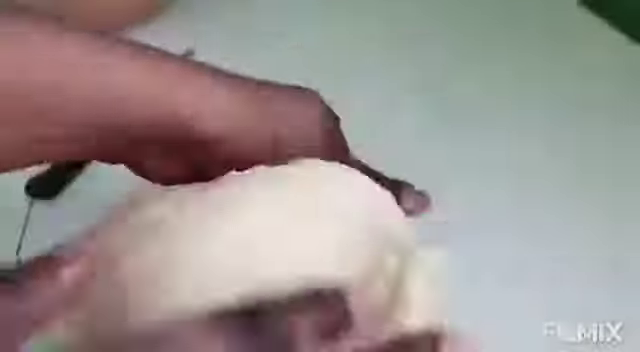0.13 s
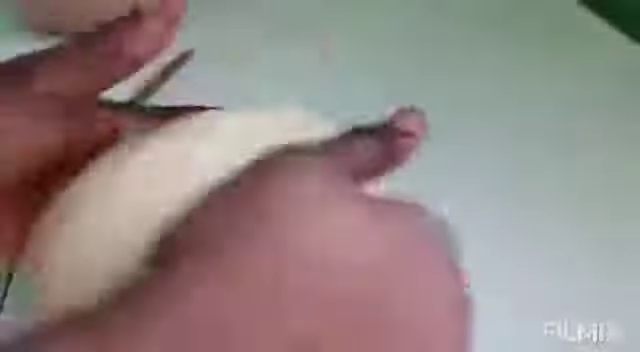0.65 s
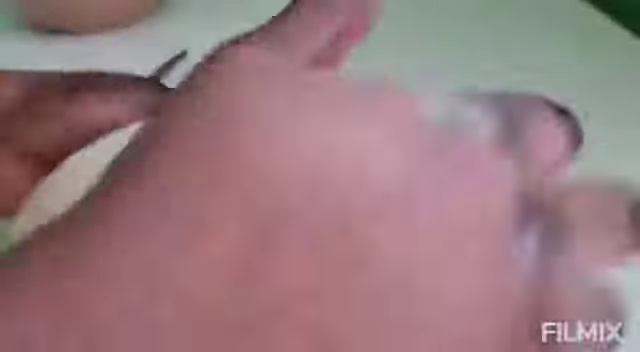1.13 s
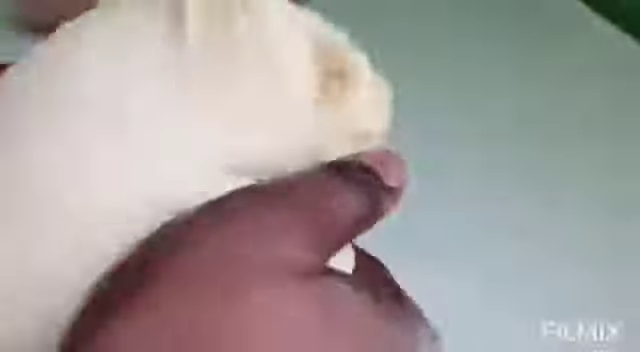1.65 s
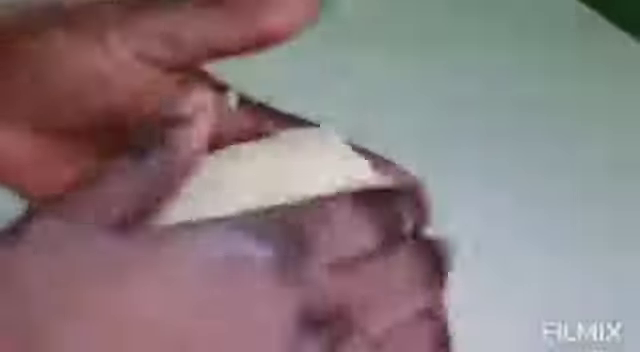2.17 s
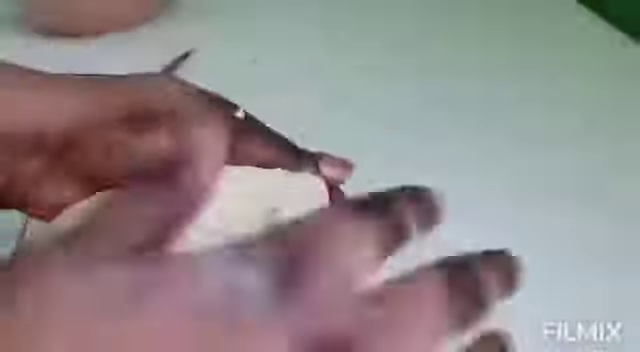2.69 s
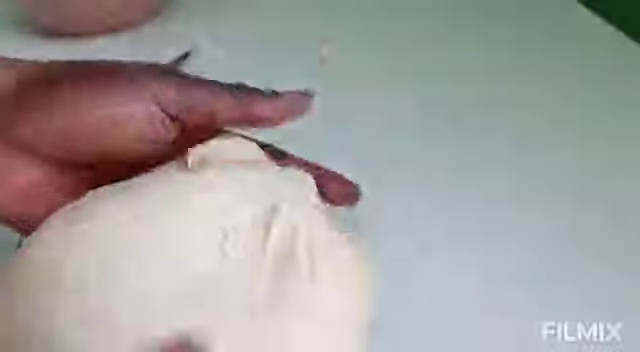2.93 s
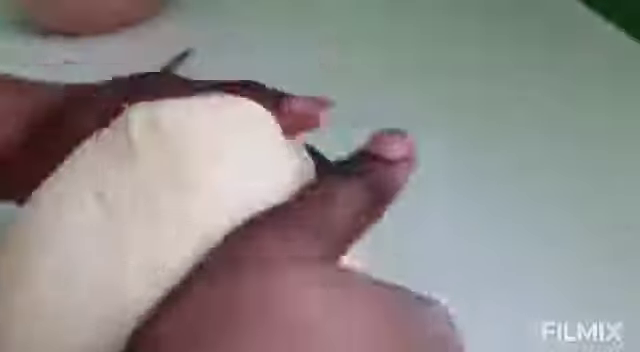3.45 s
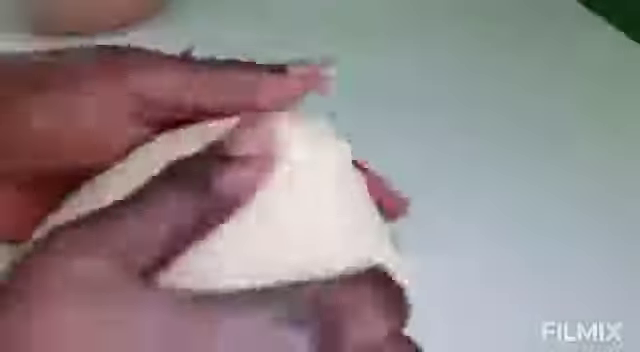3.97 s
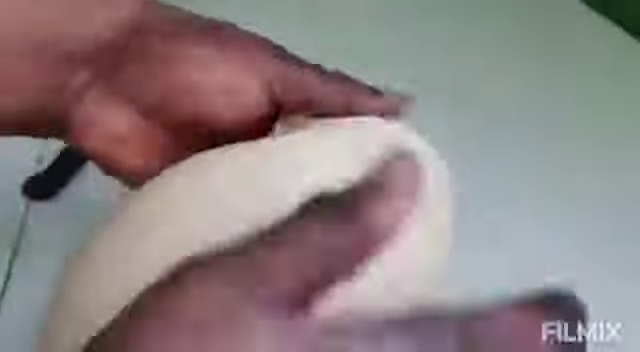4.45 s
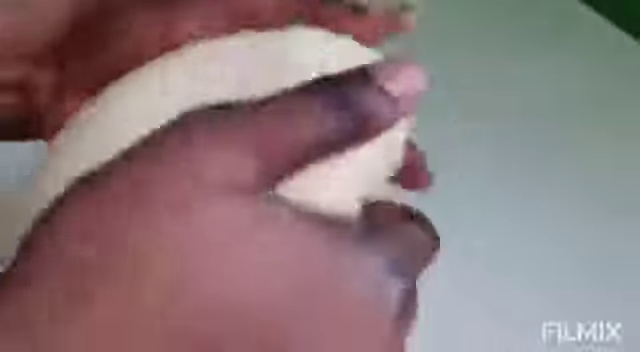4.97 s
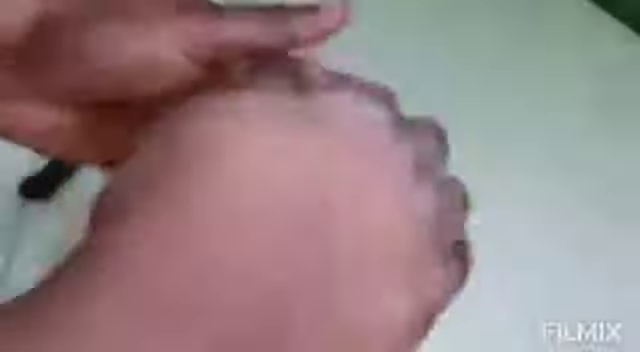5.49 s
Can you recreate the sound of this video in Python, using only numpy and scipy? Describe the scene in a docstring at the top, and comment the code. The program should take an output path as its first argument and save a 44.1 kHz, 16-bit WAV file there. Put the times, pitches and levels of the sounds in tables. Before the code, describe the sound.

Hands knead a ball of dough on a light table in a quiet kitchen, heard close and leaning left, with only a slight short room echo. From 0 to 1.4 s come uneven soft thumps, near 0.15, 0.65 to 0.7, 0.95 and 1.2, with low hollow table rumble between. Firmer thuds follow at 1.5, 1.7 and 1.85, and the heaviest slap falls at 2.0, a deep thump with a dull crack, brief knocking ring and moist squelch. After 2.2 it is calmer: faint rubbing, light dry rustles near 2.7, soft presses at 2.8, 3.1 and 3.7. Near-quiet follows until 4.5, when firm slaps resume at 4.55, 4.75, 4.9, 5.3 and strongly at 5.4, with a last knock at 5.5. Palm strokes swish weakly around the blows. Throughout, a thin high cricket whine wavers over faint airy hiss, until the end at about 5.6 s.

```python
"""In a quiet kitchen, hands knead a ball of dough on a light table: each press thumps the top and excites
its modes, and firm slaps crack, squeeze out puffs of air and ring the higher modes.
The rolling dough drives low modes with random force; palm strokes swish and squelch as shaped noise.
Crickets whine outside as wavering sines, faint air noise hisses, and feedback delays give the room's echo."""
import sys
import numpy as np
from scipy import signal
from scipy.io import wavfile

SR = 44100
rng = np.random.default_rng(int(sys.argv[2]) if len(sys.argv) > 2 else 0)


def ratio_of_db(decibels):
    """Turn decibels (scalar or array-like) into linear amplitude factors; 0 dB maps to 1."""
    return 10 ** (np.asarray(decibels, float) / 20)


def to_wav(s):
    """Save 16-bit WAV."""
    ch = np.atleast_2d(s).T  # columns
    pcm = np.round(np.clip(ch, -1, 1) * 32767)  # PCM
    wavfile.write(sys.argv[1], SR, pcm.astype(np.int16))


N = 247834   # samples

# Presses of the hands. Each row: start in seconds, then drive in dB of the soft thud, the rocking mode,
# the bending mode and the panel modes.
PRESSES = [(0.127, -39, -30.5, -38, -54), (0.163, -15.5, -33, -33, -44.5), (0.455, -53, -37, -39.5, -68),
           (0.548, -46, -47, -35.5, -60), (0.646, -19, -39, -42, -50.5), (0.697, -21, -57, -9.5, -36.5),
           (0.773, -43, -46, -20.5, -48), (0.796, -44, -52, -22.5, -53), (0.935, -16, -34.5, -31.5, -49),
           (1.001, -26.5, -34.5, -44, -52.5), (1.191, -45, -33.5, -26, -40),
           (1.268, -58, -44.5, -40.5, -54), (1.462, -41, -49, -40, -53.5), (1.506, -10, -21.5, -24.5, -50),
           (1.598, -51, -47, -31, -49), (1.674, -15.5, -28.5, -30, -48.5), (1.84, -10, -25.5, -22.5, -32.5),
           (1.871, -48, -35, -14.5, -28), (1.938, -41, -24.5, -49, -42), (2.004, -3.5, -13.5, -30, -26.5),
           (2.209, -25, -37.5, -39, -52.5), (2.269, -50, -34, -56, -54), (2.516, -56, -60, -45.5, -70),
           (2.784, -17, -24.5, -28, -48), (2.82, -44, -33.5, -33, -47.5), (2.851, -16, -48, -48, -53),
           (3.037, -49, -28.5, -33.5, -54), (3.089, -17, -24, -28, -49), (3.149, -47, -33, -50, -61),
           (3.507, -27, -42, -38, -57.5), (3.694, -21.5, -30.5, -29.5, -40), (3.987, -43, -52, -31.5, -46),
           (4.496, -37, -50, -34.5, -53), (4.534, -43, -24, -33, -34), (4.551, -39, -22, -24, -33),
           (4.728, -11, -38, -27.5, -35.5), (4.76, -39, -25, -58, -49), (4.907, -7, -37, -18, -44),
           (4.959, -28, -43, -26, -57), (5.002, -29, -34.5, -29, -60), (5.215, -36, -48, -43.5, -64),
           (5.276, -14, -27, -48, -59), (5.4, -10, -20, -28, -29.5), (5.467, -43, -23.5, -36, -40),
           (5.527, -34, -35, -22.5, -34)]
# Modes of the table top by family. Each row: frequency in Hz, relative level in dB, t60 in seconds.
ROCKING = [(87.3, 4.5, 0.27)]
BENDING = [(126.4, 4.5, 0.14)]
PANEL = [(165, -0.41, 0.12), (218.4, 1, 0.17), (290, 0.77, 0.12), (348, -4, 0.017)]
KNOCK = [(405, -17, 0.44), (488.3, -19, 0.41), (531, -18, 0.25), (622.6, -22.5, 0.21), (697, -14.5, 0.087),
         (771, -11, 0.074), (845, -16.5, 0.091), (888, -21, 0.23), (989, -12.5, 0.083), (1129, -18.5, 0.12),
         (1230, -18, 0.067), (1361, -17, 0.091), (1592, -12.5, 0.076)]   # the higher modes, rung by slaps
THUD_HZ, THUD_T60_S = 120, 0.07
RADIATES_ABOVE_HZ = 80.8
# Where the hands bear down. Each row: time in seconds, left over right in dB.
HANDS_PAN = [(0, -4.5), (.7, -4), (1.3, -6.5), (1.85, -4.5), (2.01, -3), (2.8, -3.5), (3.6, -8.5),
             (4.3, -7), (4.8, -2.5), (5.3, -8.5), (5.62, -0.5)]
BENDING_PAN_DB, KNOCK_PAN_DB = -1, -1   # added left over right: families face the sides differently

# Slaps of skin on the ball. Each row: start in seconds, then drive in dB of the dull crack,
# the bright crack, the table ring and the air puff.
SLAPS = [(0.124, -53, -39, -42, -52), (0.157, -24, -56, -56, -41.5), (0.812, -37, -40, -53, -33.5),
         (1.176, -30, -38.5, -48, -48), (1.462, -38, -54, -51, -87), (1.511, -36.5, -58, -64, -58),
         (1.673, -60, -46, -52, -46.5), (1.839, -33, -56, -57, -68), (1.882, -18, -38, -39.5, -57),
         (2.005, -4, -33.5, -25, -57), (2.21, -52, -49, -48, -75), (2.27, -61, -53.5, -69, -64),
         (2.709, -69, -89, -81, -52), (2.812, -38, -45.5, -46.5, -50), (3.085, -71, -54, -53, -65),
         (3.691, -25, -41, -42, -54), (3.99, -78, -57, -48.5, -74), (4.523, -45, -38.5, -46, -57),
         (4.535, -14, -31.5, -38, -43), (4.726, -41, -35, -41, -66), (4.909, -30, -58, -50, -41.5),
         (5.322, -31, -54, -61, -46.5), (5.401, -9.5, -33, -35.5, -52.5), (5.527, -22, -41, -39, -48)]
# Resonances of the dull crack, the bright crack and the squeezed-out air.
# Each row: frequency in Hz, relative level in dB, t60 in seconds.
SLAP_LOW = [(430, -31.5, 0.053), (645, -19, 0.028), (840, -24.5, 0.0088)]
SLAP_HIGH = [(1270, -10, 0.0024), (1700, 0, 0.0072), (2140, -18.5, 0.02), (2770, -3, 0.0016)]
PUFF = [(4580, 9.5, 0.00073), (7740, -2.5, 0.00044), (11300, 7, 0.00061)]

# Rolls of the ball between presses. Each row: peak in seconds, length in seconds, rumble level in dB,
# panel hum level in dB.
ROLLS = [(0.005, .2, -52, -75), (0.253, 0.042, -64, -69), (0.518, .1, -44, -57), (0.633, .08, -34.5, -69),
         (0.927, 0.083, -50, -54.5), (1.312, .08, -64, -60), (1.74, 0.11, -43.5, -69),
         (1.879, 0.019, -61, -30.5), (2.086, 0.063, -27, -71), (2.31, 0.083, -61, -61),
         (2.542, 0.033, -55, -60), (3.21, 0.048, -49.5, -60), (3.59, 0.2, -49.5, -68),
         (3.78, 0.091, -46, -46.5), (4.072, 0.14, -58.5, -62), (4.34, 0.11, -56.5, -52),
         (4.653, 0.11, -44.5, -64), (4.84, 0.09, -40.5, -70), (5.095, 0.13, -45, -56),
         (5.346, 0.11, -36.5, -55.5), (5.61, 0.072, -50, -72)]
# The ball also rocks around each press: level relative to the press, 10 dB rise and fall times.
ROLL_UNDER_PRESS_DB, ROLL_RISE_S, ROLL_FALL_S = -17, 0.017, 0.081
HUM_UNDER_PRESS_DB, HUM_RISE_S, HUM_FALL_S = -7.5, 0.013, 0.035

# Palm strokes over the ball. Each row: peak in seconds, length in seconds, swish level in dB,
# squelch level in dB, swish tilt in dB per octave.
STROKES = [(0.058, 0.32, -53.5, -55, -3), (0.135, 0.11, -49.5, -51, -5.5), (0.49, 0.25, -54.5, -61.5, -2.5),
           (0.696, 0.075, -46.5, -47, -2), (0.822, 0.19, -50, -51, -3.5), (1.183, 0.16, -52, -49.5, -2.5),
           (1.322, 0.19, -62, -61, -5), (1.57, 0.25, -58.5, -58.5, -5), (1.649, 0.15, -53.5, -55, -2.5),
           (1.78, 0.15, -58.5, -52.5, -4), (1.988, 0.14, -44.5, -38.5, -3.5),
           (2.28, 0.18, -63.5, -59.5, -7.5), (2.493, 0.24, -65, -66, 4), (2.678, 0.052, -52, -79, 5.5),
           (2.71, .04, -49, -78, 11), (2.743, 0.092, -52, -69, -3), (2.809, 0.15, -51, -53, -3),
           (3.06, 0.52, -59.5, -60, -2.7), (3.267, 0.33, -60, -68, -1.7), (3.685, 0.21, -50.5, -51.5, -4),
           (3.788, 0.11, -56.5, -51.5, -3.5), (4.084, 0.49, -64, -59.5, -0.5),
           (4.533, .14, -46.5, -49, -3.5), (4.738, 0.27, -55, -52.5, -4.5), (4.935, 0.19, -54, -59, -5.5),
           (5.072, 0.26, -55.5, -55.5, -3), (5.391, .11, -46, -47, -3.5), (5.52, 0.15, -50.5, -50, -2)]
STROKE_RISE_SHARE, SQUELCH_LAG_S = 0.41, 0.0069   # share of the length; the dough answers late
# Noise spectra of skin, dough and air. Each row: frequency in Hz, relative density in dB per Hz.
SWISH = [(1470, -15.5), (2500, -7), (4110, -11.5), (4430, 21), (4710, -7), (9010, -8), (12100, -0.5),
         (15500, -7.5)]
SQUELCH = [(100, -38), (170, 6), (288, -1.5), (371, 2), (407, -4), (1450, -11.5), (1650, -12.5),
           (4000, -32), (5200, -53), (8800, -120)]
AIR = [(18, -40), (30, 11), (108, 5), (187, -11), (292, -6.5), (443, -6.5), (2490, -12.5), (2990, -105),
       (4090, -12.5), (4540, -12), (5310, -14), (11300, -18.5), (15500, -86)]
AIR_DB = -60
# Correlation of the two sides of the noises. Each row: frequency in Hz, left-right likeness from 0 to 1.
LIKENESS = [(60, 1), (200, 0.12), (550, 0.2), (1600, 0.0084), (15000, 0.0041)]

# The near cricket. Each row: time in seconds, level in dB before wavering.
CRICKET = [(0.0, -66.5), (0.16, -64), (0.28, -69), (0.78, -63), (0.81, -63), (0.86, -65.5), (1.22, -71),
           (1.33, -60), (1.47, -75), (1.81, -63.5), (3.25, -73), (3.85, -67.5), (4.32, -74.5), (4.46, -64),
           (5.13, -67.5), (5.26, -75.5), (5.34, -64), (5.62, -70.5)]
CRICKET_HZ = 4410
# Fainter whines. Each row: frequency in Hz, level in dB before wavering.
FAR_WHINES = [(3567, -82), (4606, -86), (6688, -88)]

KITCHEN_T60_S, WALL_CUT_HZ, KITCHEN_DB = 0.46, 1700, -17   # t60 before the loss of treble on each round


def rms_one(x):
    """Normalisation: scales a signal to rms 1."""
    return x / np.sqrt(np.mean(x ** 2) + 1e-20)


def from_slow(values):
    """Linear interpolation: a curve given at every 40th sample becomes one value a sample."""
    return np.interp(np.arange(N) / 40, np.arange(len(values)), values)


def drift(rate_hz):
    """Low-passed noise: a random wander of rms about 1, its two equal poles at rate_hz."""
    r = np.exp(-2 * np.pi * rate_hz * 40 / SR)
    chance = rng.standard_normal(N // 40 + 2002)
    slow = signal.lfilter([1], [1, -2 * r, r * r], chance)[2000:]   # past the filter's start
    return from_slow(rms_one(slow))


def panned(db):
    """Intensity stereo: gains of left and right for a level difference in dB."""
    return ratio_of_db(np.array([db / 2, -db / 2]))


def ring(force, hz, t60):
    """Damped resonance: a unit click sets going a decaying sine of initial height 1."""
    r, w = ratio_of_db(-60 / (t60 * SR)), 2 * np.pi * hz / SR
    return signal.lfilter([0, np.sin(w)], [1, -2 * r * np.cos(w), r * r], force + 1e-18)


def soften(clicks, ms):
    """Compliant contact: yielding flesh and dough spread an impulse over a contact time."""
    r = np.exp(-1000 / (ms * SR))
    return signal.lfilter([(1 - r) ** 2], [1, -2 * r, r * r], clicks + 1e-18)


def strike(modes, s, db, pan_db, ms, chance_db, smear_ms=0, apart=0, firm=0):
    """Modal excitation: blows drive resonances unequally; sticky contact adds a dying noise burst."""
    out, at = 0, np.round(s * SR).astype(int)
    for hz, level_db, t60 in modes:
        own_pan_db = pan_db + chance_db * rng.standard_normal(len(at))   # each mode faces the sides differently
        blow_db = db + level_db + chance_db * rng.standard_normal(len(at))
        clicks = np.zeros((2, N))
        clicks[:, at] = ratio_of_db(blow_db) * panned(own_pan_db)
        if smear_ms:
            r = np.exp(-1000 / (smear_ms * SR))
            grit = rng.standard_normal(N) + apart * rng.standard_normal((2, N))   # shared and separate noise
            dying = signal.lfilter([np.sqrt(1 - r * r)], [1, -r], clicks + 1e-18)
            clicks = firm * clicks + grit * dying
        out = out + ring(soften(clicks, ms), hz, t60)
    return out


def presses():
    """Impulsive loading: a press gives a thud that swells in two like resonances, and strikes low modes."""
    s, thud_db, rocking_db, bending_db, panel_db = np.transpose(PRESSES)
    pan_db = np.interp(s, *np.transpose(HANDS_PAN))
    thud = strike([(THUD_HZ, -50, THUD_T60_S)], s, thud_db, pan_db, ms=1.21, chance_db=3)
    thud = ring(thud, THUD_HZ, THUD_T60_S)
    rocking = strike(ROCKING, s, rocking_db, pan_db, ms=1.66, chance_db=3)
    bending = strike(BENDING, s, bending_db, pan_db + BENDING_PAN_DB, ms=1.31, chance_db=1)
    panel = strike(PANEL, s, panel_db, pan_db, ms=0.5, chance_db=3)
    return thud + rocking + bending + panel


def slaps():
    """Brief impact: a firm slap cracks, squeezes out air and leaves the high modes of the top ringing."""
    s, dull_db, bright_db, ring_db, puff_db = np.transpose(SLAPS)
    pan_db = np.interp(s, *np.transpose(HANDS_PAN))
    puff = strike(PUFF, s, puff_db, pan_db, ms=0.013, chance_db=3, smear_ms=19, apart=2.4)
    puff = signal.sosfilt(signal.butter(2, 3500, "high", fs=SR, output="sos"), puff)
    dull = strike(SLAP_LOW, s, dull_db, pan_db + KNOCK_PAN_DB, ms=0.0087, chance_db=4.5,
                  smear_ms=3.2, apart=0.18, firm=0.98)
    bright = strike(SLAP_HIGH, s, bright_db, pan_db, ms=0.0033, chance_db=2,
                    smear_ms=17, apart=0.66, firm=0.75)
    table_ring = strike(KNOCK, s, ring_db, pan_db + KNOCK_PAN_DB, ms=0.05, chance_db=3,
                        smear_ms=14, apart=0.29, firm=0.51)
    return puff + dull + bright + table_ring


def swells(s, db, rise_s, fall_s):
    """Exponential envelopes, one row an event: 10 dB up in rise_s, 10 dB down in fall_s; every 40th sample."""
    late = np.arange(N // 40 + 2) * 40 / SR - np.reshape(s, (-1, 1))
    span = np.where(late < 0, np.reshape(rise_s, (-1, 1)), np.reshape(fall_s, (-1, 1)))
    return ratio_of_db(np.reshape(db, (-1, 1)) - 10 * np.abs(late) / np.maximum(span, 0.002))


def summed_db(gains):
    """Addition of powers: the level of overlapping swells, one value a sample."""
    return from_slow(10 * np.log10((gains ** 2).sum(axis=0) + 1e-20))


def roll_levels():
    """Superposed envelopes: rumble and panel hum swell around each press and with each roll."""
    s, _, rocking_db, bending_db, panel_db = np.transpose(PRESSES)
    roll_s, length, rumble_db, hum_db = np.transpose(ROLLS)
    pressed_db = np.maximum(rocking_db, bending_db) + ROLL_UNDER_PRESS_DB
    pressed_rumble = swells(s, pressed_db, ROLL_RISE_S, ROLL_FALL_S)
    pressed_hum = swells(s, panel_db + HUM_UNDER_PRESS_DB, HUM_RISE_S, HUM_FALL_S)
    rolled_rumble = swells(roll_s, rumble_db, length / 2, length / 2)
    rolled_hum = swells(roll_s, hum_db, length / 2, length / 2)
    return (summed_db(np.vstack([pressed_rumble, rolled_rumble])),
            summed_db(np.vstack([pressed_hum, rolled_hum])))


def rolling():
    """Random forcing: the ball rolling under the hands shakes low modes with an uneven force."""
    rumble_db, hum_db = roll_levels()
    out = 0
    for modes, db in [(ROCKING + BENDING, rumble_db), (PANEL[2:3], hum_db)]:
        force = rng.standard_normal(N)
        # the response to an unvarying level gives the scale
        steady = sum(ring(force, hz, t60) * ratio_of_db(level_db) for hz, level_db, t60 in modes)
        shaken = sum(ring(force * ratio_of_db(db + level_db), hz, t60) for hz, level_db, t60 in modes)
        out = out + shaken / steady.std()
    return out * panned(np.array([-4.5]))


def table_top(sound):
    """Radiation cut-off: a small top cannot push out deep bass."""
    return signal.sosfilt(signal.butter(4, RADIATES_ABOVE_HZ, "high", fs=SR, output="sos"), sound)


def at_hz(points, hz):
    """Logarithmic frequency axis: reads a spectrum between its points."""
    points = np.array(points)
    return np.interp(np.log(hz), np.log(points[:, 0]), points[:, 1])


def banded_noise(spectrum, patchy_db, grain_db, tilt_db=0):
    """Filtered noise: stereo third-octave bands with own level, flicker and likeness; tilt in dB an octave."""
    octaves = np.log2(spectrum[-1][0] / spectrum[0][0])
    edges = spectrum[0][0] * 2 ** np.arange(0, octaves + 1 / 3, 1 / 3)
    out, power = 0, 0
    together = drift(32)   # flicker shared by all bands
    white = rng.standard_normal((2, 2, N))   # neighbouring bands take turns with two noises
    for k, (low, high) in enumerate(zip(edges, np.minimum(edges[1:], 0.45 * SR))):
        band_pass = signal.butter(2, [low, high], "band", fs=SR, output="sos")
        mid, side = signal.sosfilt(band_pass, white[k % 2])
        hz = np.sqrt(low * high)
        alike = np.clip(at_hz(LIKENESS, hz), 0, 1)
        gain = ratio_of_db(at_hz(spectrum, hz) + patchy_db * drift(7) + grain_db * together)
        band = gain * (np.sqrt(1 + alike) * mid + np.sqrt(1 - alike) * side * [[1], [-1]])
        out = out + band * ratio_of_db(tilt_db * np.log2(hz / 8000))
        power = power + band.var()   # before the tilt
    return out / np.sqrt(power)


def stroke_levels():
    """Superposed envelopes: swish, squelch and tilt of the strokes, the tilt weighted by swish power."""
    s, length, swish_db, squelch_db, tilt_db = np.transpose(STROKES)
    rise, fall = STROKE_RISE_SHARE * length, (1 - STROKE_RISE_SHARE) * length
    swish = swells(s, swish_db, rise, fall)
    squelch = swells(s + SQUELCH_LAG_S, squelch_db, rise, fall)
    tilt = tilt_db @ swish ** 2 / (swish ** 2).sum(axis=0)
    return summed_db(swish), summed_db(squelch), from_slow(tilt)


def strokes():
    """Friction noise: palms swish over the floured skin of the ball while the moist dough squelches."""
    swish_db, squelch_db, tilt_db = stroke_levels()
    squelch = ratio_of_db(squelch_db) * banded_noise(SQUELCH, patchy_db=3, grain_db=-1.5)
    swish = ratio_of_db(swish_db) * banded_noise(SWISH, patchy_db=0.5, grain_db=1.27, tilt_db=tilt_db)
    return (squelch + swish) * panned(np.array([-3.2]))


def kitchen(x):
    """Reverberation: six feedback delays a side, duller on every round, stepped block by block."""
    out, dull = np.zeros((2, N)), np.exp(-2 * np.pi * WALL_CUT_HZ / SR)
    # a small room gives little bass back
    x = signal.sosfilt(signal.butter(2, 250, "high", fs=SR, output="sos"), x)
    lags = (np.geomspace(0.013, 0.037, 12) * SR).astype(int)
    for k, lag in enumerate(lags):
        loop, gain, state = x.copy(), ratio_of_db(-60 * lag / SR / KITCHEN_T60_S), [0.]
        for i in range(lag, N, lag):
            back, state = signal.lfilter([gain * (1 - dull)], [1, -dull], loop[i - lag:i], zi=state)
            loop[i:i + lag] += back[:N - i]
        out[k % 2] += (loop - x) * (-1) ** (k // 2)   # echoes only, signs alternating
    return ratio_of_db(KITCHEN_DB) * out * panned(np.array([-3.0]))


def crickets():
    """Pure tones: thin whines waver in level and phase; the near one reaches the two sides out of step."""
    db = np.interp(np.arange(N) / SR, *np.transpose(CRICKET))
    turn = 2 * np.pi * np.arange(N) / SR
    level = np.sqrt(2) * ratio_of_db(db + 2.5 * drift(12))
    side_phase = np.array([[0.55], [-0.55]])   # radians
    near = level * np.sin(CRICKET_HZ * turn + side_phase + 0.63 * drift(14))
    far = sum(ratio_of_db(far_db + 4 * drift(8)) * np.sin(hz * turn + 1.5 * drift(10))
              for hz, far_db in FAR_WHINES)
    return (near + far) * panned(np.array([-3.0]))


def air():
    """Broadband noise: the faint, slightly flickering hiss of the quiet kitchen."""
    return ratio_of_db(AIR_DB) * banded_noise(AIR, patchy_db=1.6, grain_db=-1.9) * panned(np.array([-4.0]))


def scene():
    """Superposition: table, hands, room echo of the blows, crickets and air add linearly."""
    hits = presses() + slaps()
    table = table_top(hits + rolling())
    room = kitchen(hits.mean(axis=0))
    return table + strokes() + room + crickets() + air()


def roll_off(x):
    """The treble ends steeply here."""
    return signal.sosfilt(signal.butter(12, 15750, fs=SR, output="sos"), x)


def record(dry):
    """High-pass response: the small microphone drops the deepest bass."""
    mix = signal.sosfilt(signal.butter(2, 45, "high", fs=SR, output="sos"), dry)
    return roll_off(mix)


dry = scene()
out = record(dry)
to_wav(out)
```